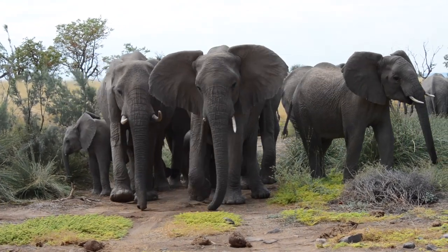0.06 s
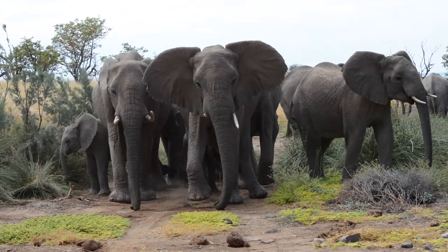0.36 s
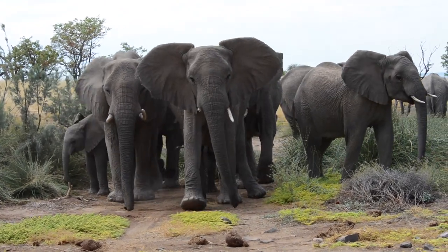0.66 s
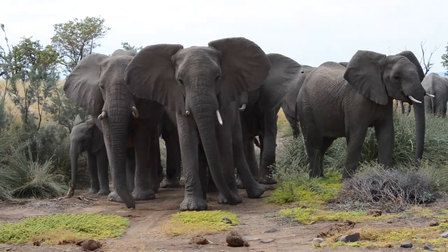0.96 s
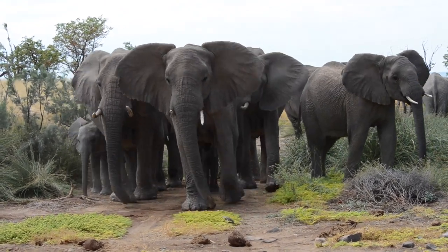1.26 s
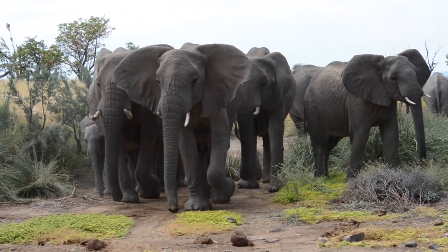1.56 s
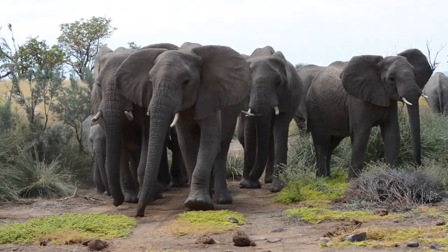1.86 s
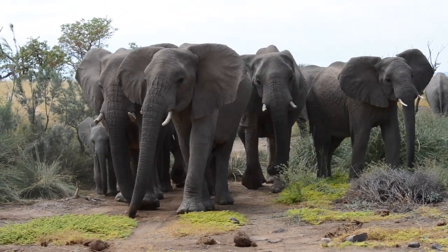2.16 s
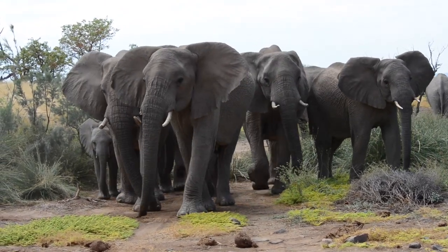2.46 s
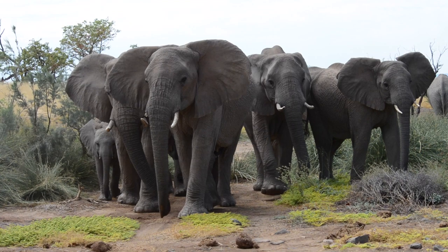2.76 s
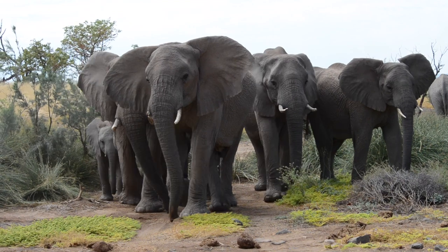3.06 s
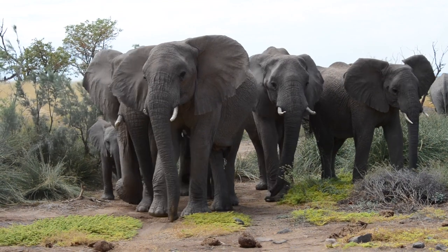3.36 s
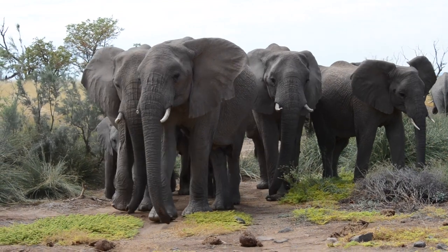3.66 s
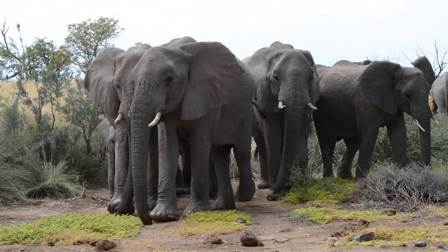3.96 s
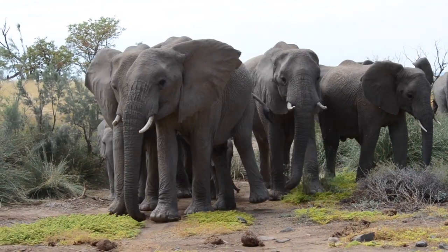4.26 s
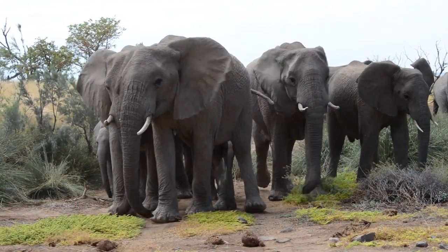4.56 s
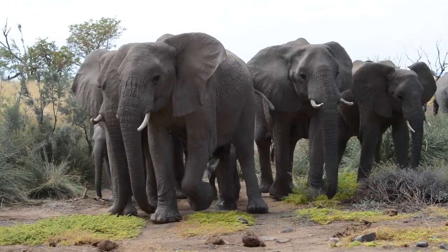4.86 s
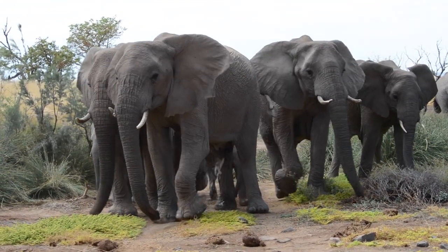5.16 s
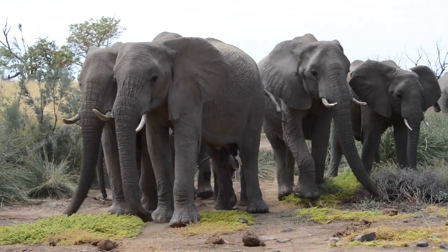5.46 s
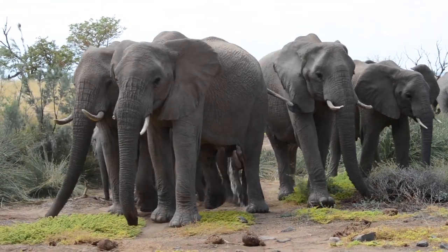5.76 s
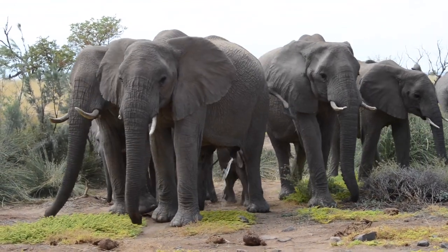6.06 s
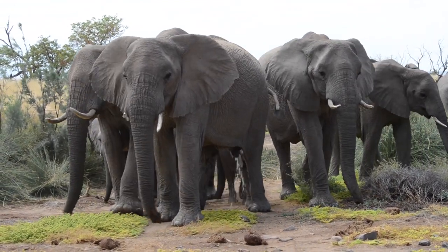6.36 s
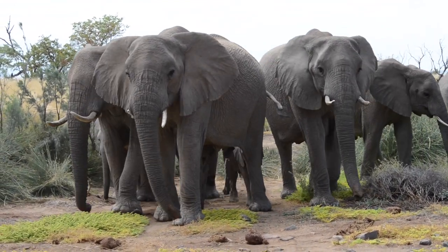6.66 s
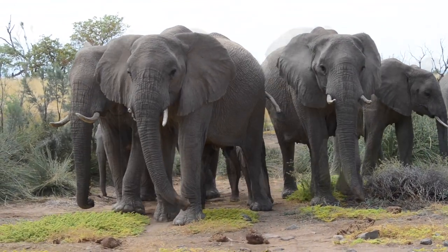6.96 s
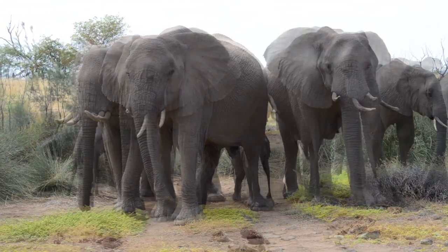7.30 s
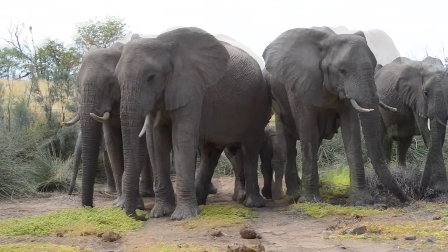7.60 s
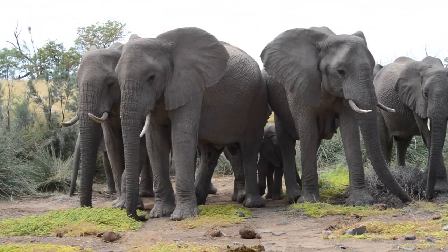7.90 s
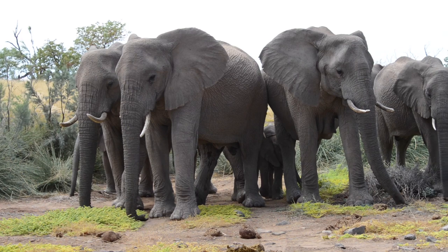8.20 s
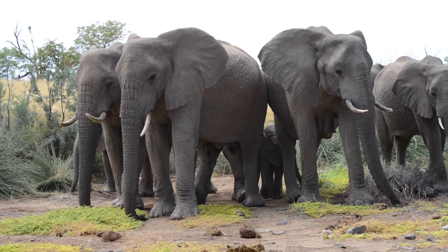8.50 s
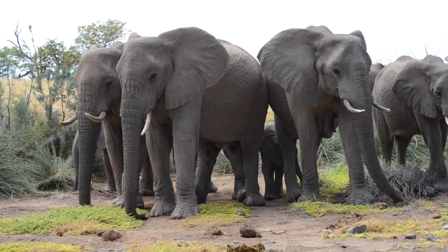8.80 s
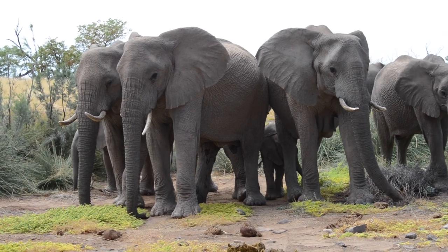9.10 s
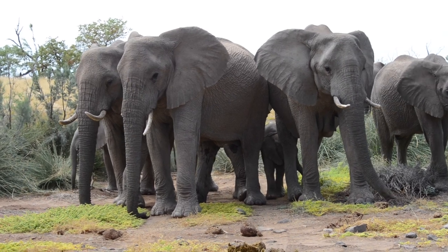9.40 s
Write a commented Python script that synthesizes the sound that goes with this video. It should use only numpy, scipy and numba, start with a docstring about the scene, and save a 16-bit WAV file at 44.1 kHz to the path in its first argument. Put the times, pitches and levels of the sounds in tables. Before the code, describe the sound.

An elephant rumbles from the start, low, throaty and fluttering, with thin wavering overtones. It eases, surges again around 1.4 seconds and fades out by 3.3. Cicadas buzz, a cricket trills and distant leaves hiss softly throughout. Wind bumps the microphone with low thuds, strongest around 1.2 and 4 seconds, returning briefly at 6.5. A twig snaps sharply at 0.3 seconds, smaller cracks follow near 0.8, and another sharp snap comes at 2.6, with faint ticks later. Dry bushes rustle lightly as the herd walks, around 4.3 seconds and again from 6 to 7.4. A small bird gives faint, high, falling chirps from about 5 to 6.8 seconds, with a quieter flock behind it. The clearing grows calmer, and a camera shutter clacks twice in quick succession at about 8.5 seconds. Insects carry on until the end at 9.5. The sound is mono.

```python
"""An elephant rumbles for three seconds: its vocal folds flap in slow pairs of beats that ring its long throat.
Wind bumps the microphone, far leaves hiss, cicadas buzz with their tiny drums and a cricket trills.
Twigs snap and bushes rustle as the herd walks through the clearing. A small bird calls in falling
chirps with its flock behind it, and near the end a camera shutter clacks twice. The sound is mono."""
import sys
import numpy as np
from scipy import signal
from scipy.fft import rfft, irfft, next_fast_len
from scipy.io import wavfile
from scipy.ndimage import uniform_filter1d
from numba import njit

SR = 44100
rng = np.random.default_rng(int(sys.argv[2]) if len(sys.argv) > 2 else 0)


def materialize(psi):
    """Save the field psi as 16-bit PCM at rate SR to the path in sys.argv[1].

    A 1-D psi becomes a single channel; in a 2-D psi each row is a channel.
    """
    bounded = np.clip(np.atleast_2d(psi).T, -1, 1)
    quanta = np.round(bounded * 32767).astype(np.int16)
    wavfile.write(sys.argv[1], SR, quanta)


N = 420713
TIME = np.arange(N) / SR

# background levels, changing in steps: start_s, leaves_db, hiss_db, cricket_db
BACKGROUND = [(0, -44, -64, -61), (1.95, -47, -64.5, -62.5), (2.59, -48, -58.5, -56),
              (4.57, -54.5, -60.5, -59.5), (6.4, -49.5, -58, -57.5), (6.9, -52, -62, -60),
              (7.44, -55, -61, -59)]


def from_db(db):
    """Turn decibels into a number to multiply by."""
    return 10 ** (np.asarray(db) / 20)


def rms_one(x):
    """Scale a signal so its average strength (rms) is 1."""
    return x / np.sqrt(np.mean(x ** 2) + 1e-20)


def evened(x, seconds):
    """Hold the strength near 1, averaged over the given time."""
    power = uniform_filter1d(x ** 2, max(int(seconds * SR), 2))
    return x / np.sqrt(np.abs(power) + 1e-12)


def in_time(rows):
    """Join timed rows with straight lines: one curve for each column after the time."""
    times, *columns = np.transpose(rows)
    return [np.interp(TIME, times, column) for column in columns]


def in_steps(rows, fade_s=.035):
    """Hold each row's values until the next row, with a short fade."""
    times, *columns = np.transpose(rows)
    row = np.searchsorted(times[1:], TIME)
    return [uniform_filter1d(column[row], int(fade_s * SR)) for column in columns]


def swell(peak_s, peak_db, rise_s, fall_s, roundness=1):
    """A level that climbs its last 20 dB in rise_s, peaks, then sinks 20 dB in fall_s."""
    away = np.maximum((peak_s - TIME) / rise_s, (TIME - peak_s) / fall_s)
    return from_db(peak_db - 20 * np.minimum(away ** roundness, 10))


def swells(rows):
    """Combine overlapping swells by adding their power."""
    return np.sqrt(sum(swell(*row) ** 2 for row in rows))


def add(out, start_s, sound):
    """Mix a short sound in at a given time."""
    at = int(start_s * SR)
    out[at:at + len(sound)] += sound[:N - at]


def shaped(x, gain):
    """Make each frequency louder or softer by gain(hz)."""
    size = next_fast_len(len(x))
    hz = np.arange(size // 2 + 1) * SR / size + 1e-6
    return irfft(rfft(x, size) * gain(hz), size)[:len(x)]


def noise(colour):
    """Noise of strength 1 whose balance of low and high follows a table."""
    hz, db = np.transpose(colour)
    white = rng.standard_normal(N)
    return rms_one(shaped(white, lambda f: from_db(np.interp(np.log(f), np.log(hz), db))))


def drift(rate_hz):
    """A smooth random wobble of strength 1; a higher rate wobbles faster."""
    return rms_one(shaped(rng.standard_normal(N), lambda f: np.exp(-(f / rate_hz) ** 2)))


def band(x, low_hz, high_hz, order=2):
    """Keep the sound between two frequencies."""
    edges_hz = [low_hz, min(high_hz, SR / 2 - 1)]
    return signal.sosfilt(signal.butter(order, edges_hz, "band", fs=SR, output="sos"), x)


def shifted(x, hz):
    """Slide every frequency of a sound by a changing amount."""
    turning = np.exp(2j * np.pi * np.cumsum(hz) / SR)
    return np.real(signal.hilbert(x, next_fast_len(N))[:N] * turning)


@njit
def resonate(x, angle, decay):
    """Ring at a moving pitch: each sample, the ring turns by angle and shrinks by decay."""
    out, state = np.zeros(len(x)), 0j
    for i in range(len(x)):
        state = state * decay * complex(np.cos(angle[i]), np.sin(angle[i])) + x[i]
        out[i] = 2 * (1 - decay) * state.real
    return out


def rumble(beat_at_s=2.278, second_beat_cycles=.40, jitter_cycles=.012, shimmer_db=1.4,
           puff_s=.005, folds_open_s=.009):
    """The vocal folds flap in pairs of beats; each beat and its puff of air ring chest, mouth and trunk."""
    # two surges and a fade: time_s, chest_db, mouth_db, rasp_db
    loudness = [(0.08, -35.5, -34.5, -46.5), (0.3, -40, -41, -50), (0.9, -43, -43.5, -51),
                (1.38, -37, -36, -42.5), (1.56, -39.5, -35.5, -47), (1.76, -36, -37.5, -50),
                (2.0, -37, -39.5, -51), (2.75, -36, -42.5, -52), (2.87, -45, -45.5, -58),
                (3.1, -51.5, -55.5, -64), (3.3, -76, -61, -89)]
    # vocal folds: time_s, pairs_per_s, air_leak (0-1), tuning (multiplies the ringing pitches)
    folds = [(.12, 19.5, 1, 0.97), (.24, 11.5, 1, 0.86), (.75, 12.5, 0.87, .98), (1.3, 15.15, 1, .95),
             (1.8, 15.15, .7, .987), (2.02, 15.2, .27, 0.98), (2.2, 16.1, .35, 0.97),
             (2.45, 16.3, .3, 0.99), (2.8, 16.45, 0.53, 0.94)]
    # the mouth closing: time_s, closed (0-1)
    closing = [(1.85, 0.08), (2.2, 0.99)]
    # low, middle and high rings of the body: pitch_hz, width_hz, mouth_open_db, mouth_closed_db
    chest_rings = [(93, 36, -3.5, -8), (150, 62, 0.5, 1), (201, 49, -1.5, -2)]
    mouth_rings = [(308, 42, -9, 0), (427, 52, -6, -12.5), (515, 41, -1.5, -10), (603.4, 42, -4, 0),
                   (720, 46, -3, -2.5), (894, 40, -6.5, -9.5), (1004, 44, -8, -11.5),
                   (1256, 87, -12.5, -11)]
    rasp_rings = [(1658, 46, -6, 0.5), (1962, 55, -1.5, 5.5), (2572, 45, -2, -1), (2880, 78, -1, -10),
                  (3180, 81, -0.5, -6), (3720, 300, -6, -6), (4420, 170, -9, -14)]

    size = int(loudness[-1][0] * SR)
    chest_db, mouth_db, rasp_db = in_time(loudness)
    pairs_per_s, leak, tuning, closed = [curve[:size] for curve in in_time(folds) + in_time(closing)]
    cycles = np.cumsum(pairs_per_s) / SR
    cycles -= np.interp(beat_at_s, TIME[:size], cycles)   # line a first beat up with this moment
    cycles += jitter_cycles * drift(15)[:size]
    first, second = [np.diff(np.floor(cycles - lag), prepend=np.floor(cycles[0] - lag)) > 0
                     for lag in (0, second_beat_cycles)]
    strength = from_db(shimmer_db * rng.standard_normal(size))

    def flow(beats, rise_s):
        """Air swells and dies away with each beat."""
        age = TIME[:SR // 10] / rise_s
        return signal.fftconvolve(beats, age * np.exp(1 - age))[:size]

    def cavity(rings, level_db, breathiness, second_beat_db, low_hz, high_hz):
        """Beats and breath ring one air space in the body."""
        beats = strength * (first + from_db(second_beat_db) * second)
        breath = (flow(beats, puff_s) + leak) * rng.standard_normal(size)
        source = rms_one(beats) + breathiness * rms_one(breath)
        rung = 0
        for k, (hz, width_hz, open_db, closed_db) in enumerate(rings):
            gain = from_db(open_db + closed * (closed_db - open_db))
            ring = resonate(source, 2 * np.pi * hz * tuning / SR, np.exp(-np.pi * width_hz / SR))
            rung += (-1) ** k * gain * ring   # every other ring is flipped upside down
        rung *= flow(beats, folds_open_s) + 10 * leak ** 2   # tightly shut folds choke the ring
        rung = band(rung, low_hz, high_hz, order=3)
        rung = band(rung, low_hz / 2, high_hz)
        return evened(rung, seconds=.142) * from_db(level_db[:size])

    chest = cavity(chest_rings, chest_db, breathiness=.57, second_beat_db=-.5, low_hz=55, high_hz=248)
    mouth = cavity(mouth_rings, mouth_db, breathiness=1.65, second_beat_db=.5, low_hz=267, high_hz=1280)
    rasp = cavity(rasp_rings, rasp_db, breathiness=5.8, second_beat_db=-10, low_hz=1510, high_hz=4170)
    return np.pad(chest + mouth + rasp, (0, N - size))


def overtones(pitch_wander=.0057, flutter_db=1.0):
    """Thin, slightly unsteady tones glide above the elephant's beats."""
    # tones in the rumble: peak_s, level_db, rise_s, fall_s, pitch_hz, glide_hz_per_s
    tones = [(.03, -32, 0.44, 0.21, 440, -120), (.1, -40.5, 0.56, 0.35, 304, -26),
             (0.055, -39, .3, .2, 720, -110), (.3, -40.5, .1, .18, 399, -19.5),
             (0.377, -42.5, .2, 0.16, 702, -30.5), (.6, -38, .14, 0.14, 401, -25.5),
             (1.165, -40.5, 0.24, 0.27, 433, 35), (1.526, -34, 0.23, .35, 440, 20),
             (1.88, -41, 0.16, 0.22, 430, -70), (1.75, -39.5, 0.65, .33, 712, 20),
             (1.55, -45, .3, 0.46, 888, -40), (1.8, -42.5, 0.32, .3, 510, 15)]
    out, unsteady = 0, 1 + pitch_wander * drift(23)
    for peak_s, db, rise_s, fall_s, hz, glide in tones:
        pitch_hz = (hz + glide * (TIME - peak_s)) * unsteady
        phase = 2 * np.pi * np.cumsum(pitch_hz) / SR
        out += swell(peak_s, db, rise_s, fall_s, roundness=1.86) * np.sin(phase)
    return out * from_db(flutter_db * drift(24))


def wind(calm_db=-60, lump_db=4.0, bumps_per_s=6, over_gust_db=3.5, spread_db=1.5,
         bump_hz=175, spread_octaves=.3, rise_cycles=.51):
    """Lumpy swirls of air hit the microphone; the hardest give a thud only a wave or two long."""
    # gusts: peak_s, level_db, rise_s, fall_s
    gusts = [(.25, -38, 3, 2.4), (.92, -33, 0.18, .4), (1.22, -27, 0.5, 0.23), (2.62, -35.5, 0.39, 0.61),
             (3.45, -38, 0.27, 0.33), (3.62, -35, 0.33, .2), (3.92, -27, 0.16, 0.65), (4.77, -44, .2, 0.45),
             (4.98, -49.5, .15, 0.56), (5.5, -49, .3, 0.25), (6.47, -41.5, 0.23, 0.82),
             (6.77, -41, 0.55, 0.1), (7.12, -50.5, 0.26, 0.17), (8.55, -54, 0.44, 0.34),
             (8.83, -47, .2, 0.17), (9.54, -51, 1.05, .5)]
    # the wind's deep tone: frequency_hz, level_db
    colour = [(12, -26), (30, -3.5), (75, 2), (120, -0.5), (190, -8), (290, -15), (400, -24), (600, -32),
              (1500, -56)]
    # the hardest bumps: start_s, level_db, pitch_hz
    hard_bumps = [(0.901, -19, 132), (.945, -19, 246), (1.096, -15.5, 155), (1.188, -12.5, 238),
                  (1.202, -17, 164), (1.216, -8.5, 162), (1.266, -21, 171), (2.596, -24.5, 131),
                  (3.643, -25, 107), (3.845, -23.5, 227), (3.886, -23.5, 280), (4.032, -22, 214),
                  (4.086, -22, 200), (4.305, -29, 153), (4.408, -30.5, 137), (4.763, -28.5, 123),
                  (4.975, -38, 97), (5.131, -39, 108), (6.515, -18.5, 210), (6.684, -32, 170),
                  (7.131, -41, 137), (7.369, -34.5, 290)]
    gust = np.hypot(swells(gusts), from_db(calm_db))
    swirls = evened(noise(colour) * from_db(lump_db * drift(33)), seconds=.16)
    out = gust * from_db(-.5) * swirls
    # smaller bumps come at random and are louder in a gust
    chance, loud, high = rng.random(N), rng.standard_normal(N), rng.standard_normal(N)
    small_bumps = []
    for i in np.flatnonzero(chance < bumps_per_s / SR):
        db = 20 * np.log10(gust[i]) + over_gust_db + spread_db * loud[i]
        small_bumps.append((i / SR, db, bump_hz * 2 ** (spread_octaves * high[i])))
    for start_s, db, hz in hard_bumps + small_bumps:
        cycles = TIME[:SR // 10] * hz
        age = cycles / rise_cycles
        thud = (age * np.exp(1 - age)) ** 2 * np.sin(2 * np.pi * cycles)
        add(out, start_s, from_db(db) * thud)
    return out


def far_leaves():
    """Far leaves make a soft rush under a fine, even hiss."""
    # tone of the leaves and of the hiss: frequency_hz, level_db
    leaves_colour = [(15, -17), (40, -24.5), (130, -3.5), (220, 1), (330, 0.5), (550, -4), (1000, -5.5),
                     (2000, -10.5), (3200, -11), (6000, -14), (10000, -30.5), (16000, -39)]
    hiss_colour = [(1000, -35), (3000, -2), (6000, 3.5), (10000, -0.5), (16000, -3.5)]
    leaves_db, hiss_db, _ = in_steps(BACKGROUND)
    return from_db(leaves_db) * noise(leaves_colour) + from_db(hiss_db) * noise(hiss_colour)


def insect_hiss(bands):
    """Bands of noise, strength 1 in all, stand for many insect clicks blurring together."""
    def gain(f):
        return np.sqrt(sum(from_db(db) ** 2 / (1 + ((f - hz) / width_hz * np.pi / 2) ** 2) ** 3
                           for hz, width_hz, db in bands))
    return rms_one(shaped(rng.standard_normal(N), gain))


def cicadas(drum_hz=58, buzz_depth=.072, rate_wander=.0295, waver_db=1.0,
            pitch_wander_hz=15, sag_hz_per_s=90):
    """A far chorus and one nearer cicada buzz by clicking tiny drums; the near one's pitch sags."""
    # loudness of the far chorus: time_s, level_db
    chorus_levels = [(0, -47.5), (2.0, -49.5), (2.57, -57.5), (2.61, -46.5), (3.7, -45), (4.6, -48),
                     (5.4, -47), (6.1, -50), (6.6, -45.5), (7.1, -50), (8.2, -46.5), (9.54, -47.5)]
    # bands the chorus and the near cicada sing in: pitch_hz, width_hz, level_db
    chorus_bands = [(3800, 150, -21), (5080, 380, -15), (5660, 260, -8.5), (6028, 320, -3.5),
                    (6710, 570, -6), (7240, 100, 1.5), (7450, 360, -1.5), (7830, 110, 2.5),
                    (8005, 240, -1.5), (8530, 350, -4.5), (9170, 280, -12), (9800, 270, -21)]
    near_bands = [(6760, 700, -10.5), (7370, 390, -2), (7950, 520, 0.5), (8490, 230, -2.5),
                  (8850, 520, -10)]
    # swells of the near cicada: peak_s, level_db, rise_s, fall_s, pitch_offset_hz
    near_swells = [(3.5, -45, 1.9, 3.5, -60), (5.1, -46, 1.2, 4.5, 60), (6.1, -49, 1.3, .9, -60)]
    voices = [(chorus_bands, from_db(in_time(chorus_levels)[0]), 0)]
    for peak_s, db, rise_s, fall_s, offset_hz in near_swells:
        sag_hz = sag_hz_per_s * (TIME - peak_s)
        voices.append((near_bands, swell(peak_s, db, rise_s, fall_s), offset_hz - sag_hz))
    out = 0
    for bands, gain, offset_hz in voices:
        phase = 2 * np.pi * np.cumsum(drum_hz * (1 + rate_wander * drift(3.6))) / SR
        buzz = 1 + buzz_depth * (np.cos(phase) + np.cos(2 * phase) / 2)
        song = buzz * shifted(insect_hiss(bands), offset_hz + pitch_wander_hz * drift(3))
        out += gain * from_db(waver_db * drift(11)) * song
    return out


def cricket(pitch_hz=4326, width_hz=300):
    """A cricket's unbroken trill: one narrow, smoothed band of hiss."""
    _, _, cricket_db = in_steps(BACKGROUND)
    return from_db(cricket_db) * evened(insect_hiss([(pitch_hz, width_hz, 0)]), seconds=.013)


def twigs(splinter_times_longer=3.5):
    """Dry wood breaks with a short ring and a spray of splinters."""
    # snaps: start_s, level_db, pitch_hz, ring_s (time to fade 60 dB), splinter_db (against the ring)
    snaps = [(.132, -29, 4500, 0.0064, -11), (0.3148, -11.5, 3280, 0.013, -14),
             (0.3154, -14, 1710, 0.011, -11), (.316, -20, 970, 0.017, -9), (.716, -25, 700, 0.011, -7),
             (0.787, -19.5, 930, 0.0076, -24), (.845, -21.5, 1090, 0.0069, -12.5),
             (2.5967, -12.5, 4640, 0.0064, -22), (2.598, -29, 2200, 0.01, -17),
             (5.813, -42.5, 1700, 0.033, -8), (6.3938, -31, 1990, 0.0027, -2.5),
             (7.803, -40, 8600, .008, 0), (8.441, -49, 3000, .012, 3), (8.61, -40, 1430, 0.032, -5)]
    out, t = np.zeros(N), TIME[:SR // 10]
    for start_s, db, hz, ring_s, splinter_db in snaps:
        ring = np.sin(2 * np.pi * hz * t) * from_db(-60 * t / ring_s)
        splinters = rms_one(band(rng.standard_normal(len(t)), hz / 2, hz * 2.04, order=3))
        splinters *= from_db(splinter_db - 60 * t / (ring_s * splinter_times_longer))
        add(out, start_s, from_db(db) * (ring + splinters))
    return band(out, low_hz=200, high_hz=8100)


def bushes(crackle_db=4.5):
    """Dry stems scrape against legs in crackly bursts."""
    # rustles: peak_s, level_db, rise_s, fall_s
    rustles = [(4.27, -47, 0.26, 0.65), (4.54, -52, .2, 0.046), (6.5, -52.5, 0.66, 1.3),
               (7.27, -56, .25, .2), (7.416, -41.5, 0.2, 0.03)]
    # tone of the stems: frequency_hz, level_db
    colour = [(200, -40), (400, -0.5), (1200, -9), (2400, -10.5), (3500, -1.5), (5500, -1), (8000, -13.5),
              (11000, -19), (16000, -31)]
    return swells(rustles) * rms_one(noise(colour) * from_db(crackle_db * drift(135)))


def birds(start_hz=6080, chirp_s=.063, flutter_db=3.5, echo_db=-4, echo_s=.018,
          flock_span_s=(5.62, 6.72), flock_chirps=24, flock_db=-60.5, flock_end_hz=3510,
          spread_db=2.0, spread_octaves=.2):
    """Thin whistles fall fast, then flatten; the bushes scatter them into a short echo."""
    # the nearest bird's chirps: start_s, level_db, end_hz
    near_chirps = [(4.915, -55, 4200), (5.551, -49, 3300), (5.585, -51.5, 4500), (6.168, -43, 3950),
                   (6.258, -57, 3800), (6.44, -53, 3900), (6.743, -51.5, 3900)]
    flock = []
    for slot_s in np.linspace(*flock_span_s, flock_chirps):
        late, loud, high = rng.standard_normal(3)
        end_hz = flock_end_hz * 2 ** (spread_octaves * high)
        flock.append((slot_s + chirp_s * late / 2, flock_db + spread_db * loud, end_hz))
    out, progress = np.zeros(N), np.linspace(0, 1, int(chirp_s * SR))
    arch = np.sqrt(np.abs(np.sin(np.pi * progress)))
    for start_s, db, end_hz in near_chirps + flock:
        hz = end_hz + (start_hz - end_hz) * (1 - progress) ** 1.6
        add(out, start_s, from_db(db) * arch * np.sin(2 * np.pi * np.cumsum(hz) / SR))
    out *= from_db(flutter_db * drift(150))   # a broken, wavering tone
    scatter = rng.standard_normal(SR // 10) * np.exp(-TIME[:SR // 10] / echo_s)
    echo = signal.fftconvolve(out, scatter / np.linalg.norm(scatter))[:N]
    return out + from_db(echo_db) * echo


def shutter(strike_s=.0023, bounce_after_s=.0026, bounce_db=-3, rattle_s=.0057):
    """The camera's mirror strikes its stop, bounces and rattles out."""
    # clacks: start_s, level_db
    clacks = [(8.5111, -22), (8.6229, -23.5)]
    # tone of a clack: frequency_hz, level_db
    colour = [(100, -22), (400, -11), (1100, -6), (2200, -9), (3200, -11.5), (3850, -1), (4400, 2.5),
              (5000, -1.5), (6500, 1), (7100, -10), (9000, -29), (11000, -36), (16000, -39)]
    force, t = np.zeros(N), TIME[:SR // 10]
    for start_s, db in clacks:
        add(force, start_s, from_db(db) * np.exp(-t / strike_s))
        add(force, start_s + bounce_after_s, from_db(db + bounce_db) * np.exp(-t / rattle_s))
    return force * noise(colour)


def scene():
    """Add up all the sounds; left and right are the same."""
    mono = rumble() + overtones() + wind() + far_leaves() + cicadas() + cricket()
    mono += twigs() + bushes() + birds() + shutter()
    return np.array([mono, mono])


def record(dry, dip_at_s=7.445, dip_db=-17, dip_width_s=.0066, cutoff_hz=15900):
    """The level dips briefly once, and the highest treble is cut."""
    dip = from_db(dip_db * np.exp(-((TIME - dip_at_s) / dip_width_s) ** 2))
    treble_cut = signal.ellip(12, .1, 80, cutoff_hz, fs=SR, output="sos")
    return signal.sosfilt(treble_cut, dry * dip)


dry = scene()
out = record(dry)
materialize(out)
```